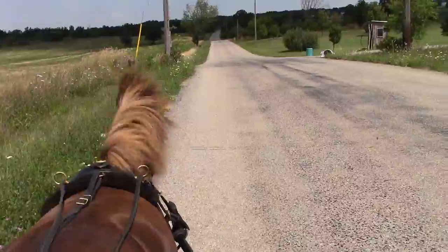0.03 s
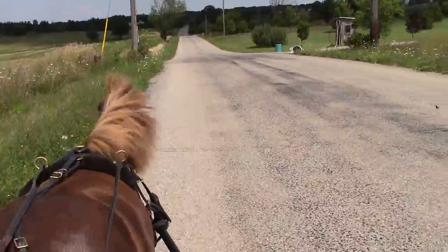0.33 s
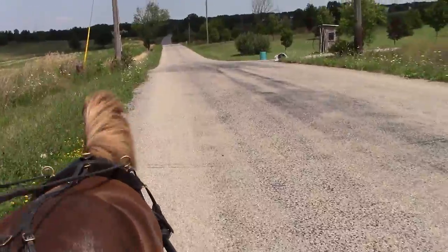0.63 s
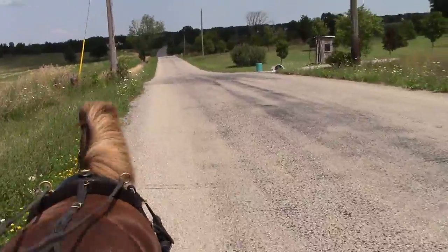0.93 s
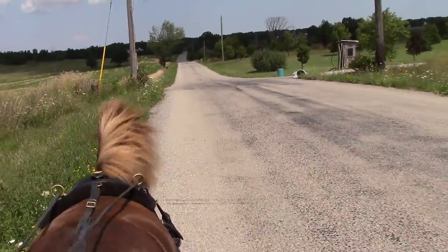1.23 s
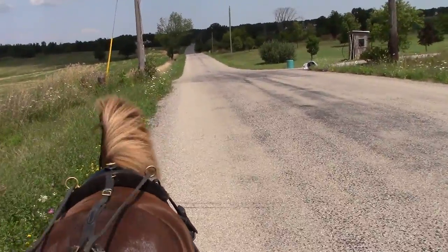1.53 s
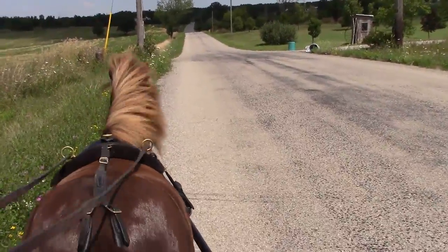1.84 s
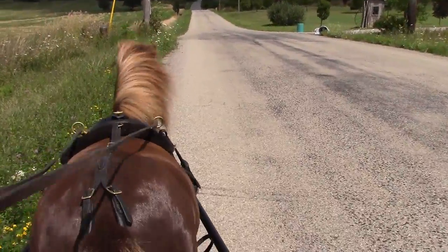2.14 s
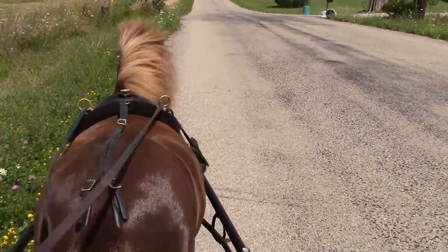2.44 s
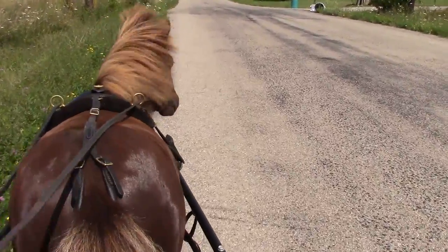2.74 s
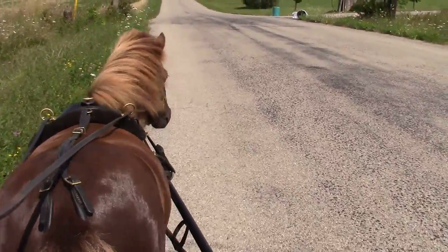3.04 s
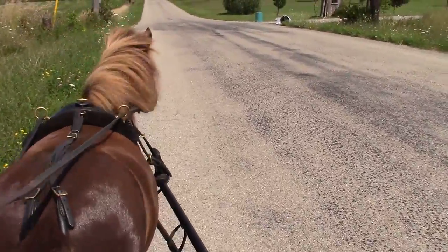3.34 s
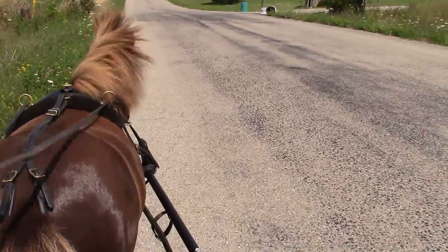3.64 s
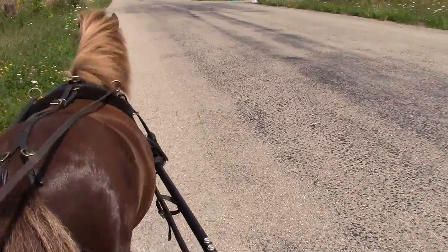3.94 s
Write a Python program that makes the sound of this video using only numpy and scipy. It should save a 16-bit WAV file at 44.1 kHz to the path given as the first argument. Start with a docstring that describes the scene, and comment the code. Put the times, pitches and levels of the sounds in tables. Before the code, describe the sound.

A horse's hooves clop at a brisk walk on a paved country road, heard from the cart it pulls. Wheels crunch grit, stones snap and the wooden cart knocks now and then, with faint insects and light wind.

```python
"""A horse walks briskly along a paved country road, heard from the cart it pulls.
Each hoof lands with a hollow clop, often heel then toe: a blow, ringing wall modes, a short grind.
Stones snap under wheels and shoes, bumps knock the wooden cart, the wheels rush and crunch over grit.
Insects chirp in the verge and gusts rumble on the microphone."""
import sys
import numpy as np
from scipy import signal
from scipy.fft import rfft, irfft
from scipy.io import wavfile
from scipy.ndimage import map_coordinates

SR = 44100
rng = np.random.default_rng(int(sys.argv[2]) if len(sys.argv) > 2 else 0)


def file_out(sig):
    """Save sig as 16-bit WAV at sys.argv[1]."""
    # one column per channel
    cols = np.atleast_2d(sig).T
    # limit, then scale
    lim = np.clip(cols, -1, 1)
    pcm = np.round(lim * 32767).astype(np.int16)
    wavfile.write(sys.argv[1], SR, pcm)


N = 176400

# hoof contacts: start_s, relative_db, pitch_hz, hollow_relative_db
HOOF_CONTACTS = [(0.074, -26.5, 1980, -1.5), (0.087, -24.5, 1250, -1), (0.191, -27, 945, 1.5),
                 (0.379, -21, 1780, -14), (0.388, -27, 1320, -1.5), (0.596, -28.5, 1490, -3.5),
                 (0.783, -25, 1330, -21), (0.795, -8, 1980, -13), (0.998, -30, 1130, 6),
                 (1.215, -22, 1360, -10), (1.2212, -14.5, 2200, -18), (1.423, -25, 1630, -6),
                 (1.61, -22, 1320, -9), (1.614, -14, 1350, -9), (1.819, -26, 1180, 4.5),
                 (1.826, -23, 1230, -5), (1.987, -26.5, 1330, -0.5), (1.995, -16, 2050, -25),
                 (2.203, -25.5, 1640, -17), (2.414, -25.5, 1450, 5), (2.432, -17.5, 2320, -4),
                 (2.647, -24.5, 1200, 2), (2.857, -22, 2120, -7), (2.863, -25.5, 1960, -10),
                 (3.07, -28, 1910, -5), (3.172, -21, 1340, 1), (3.253, -19, 1740, -3.5),
                 (3.419, -27, 1650, -9), (3.68, -21.5, 1310, 1), (3.69, -13.5, 1970, -30),
                 (3.902, -18, 1950, -2.5)]
# hoof wall modes: pitch_hz, gain_db, t60_s
WALL_MODES = [(810, -1, 0.03), (1306, 4, 0.027), (1816, -2, 0.01), (2270, -6.5, 0.01)]
# hoof click spectrum: freq_hz, gain_db
HOOF_EQ = [(80, -42), (300, -17), (700, -1), (1300, 7.5), (2300, 6.5), (3300, -5), (6000, -8), (16000, -18)]
# snapping stones: start_s, relative_db, pitch_hz, crack_relative_db
STONE_SNAPS = [(0.258, -17, 2200, 11), (0.674, -14, 2260, 19.5), (1.358, -22.5, 2940, 20.5),
               (1.543, -23.5, 1930, 10), (1.667, -15, 1730, 6), (1.677, -16.5, 1640, 12),
               (1.955, -26, 2600, -10), (1.972, -23, 2550, 10), (2.067, -23.5, 2370, 6),
               (2.736, -20.5, 1880, 15), (2.761, -13.5, 3040, 12.5), (2.92, -26.5, 2430, 2),
               (3.145, -20.5, 2390, 9), (3.173, -18.5, 1370, 19), (3.335, -17.5, 2080, 11),
               (3.537, -22, 2350, -27), (3.585, -24.5, 3020, 14), (3.604, -23, 2930, 15.5),
               (3.7613, -6.5, 2500, 4.5), (3.825, -20, 3260, 20)]
# stone click spectrum: freq_hz, gain_db
STONE_EQ = [(120, -15), (600, -18), (1500, 2), (2400, 5.5), (4300, -2.5), (6600, 1), (9000, -8.5),
            (16000, -24)]
# treble crack spectrum: freq_hz, gain_db
CRACK_EQ = [(1000, -72), (4000, -3), (6600, 4.5), (9000, -2.5), (16000, -7)]
# cart knocks: start_s, relative_db, pitch_hz
CART_KNOCKS = [(0.417, -20, 436), (0.457, -29, 410), (0.494, -25, 382), (2.495, -13.5, 457),
               (2.54, -18.5, 292), (3.416, -23, 386), (3.475, -25.5, 355), (3.711, -20.5, 330),
               (3.791, -15, 336)]
# thud spectrum of cart body and hoof hollow: freq_hz, gain_db
THUD_EQ = [(60, -41), (230, -3), (420, 1), (600, -4), (900, -6.5), (2000, -16), (5000, -26), (16000, -59)]
# rolling wheel envelope: time_s, level_db
ROLL_LEVELS = [(0, -57.5), (.45, -53.5), (.7, -55.5), (1.3, -53.5), (3, -53.5), (3.65, -51), (4, -53)]
# rolling wheel spectrum: freq_hz, gain_db
ROLL_EQ = [(30, -8), (80, -8), (150, -22), (295, 12.5), (600, 3.5), (1000, 0.5), (2100, -9), (3300, -8.5),
           (4500, -6), (6300, -12.5), (10500, -12.5), (15500, -19)]
# insect choruses: pitch_hz, spread_ratio, chirps_per_s, chirp_s, fall_ratio, pulse_db, level_db
CHORUSES = [(8503, 0.0327, 420, 0.00743, 0.063, 0.8, -53), (8845, 0.0142, 19, 0.034, 0.111, -0.5, -56.5),
            (12480, 0.025, 450, 0.0057, 0.022, 5, -65), (4850, 0.056, 160, 0.0123, 0.1, 0, -63)]
# near insect phrases: start_s, pitch_hz, chirps_per_s, level_db
NEAR_PHRASES = [(0.575, 4920, 22, -54), (1.08, 5050, 21, -51.5), (1.355, 4970, 25, -48),
                (1.376, 8140, 16.5, -42.5), (1.607, 5030, 24.2, -49.5)]
# wind gusts: centre_s, level_db, half_width_s
WIND_GUSTS = [(0.838, -51.5, 0.06), (1.226, -46.5, 0.2), (1.464, -43, 0.041), (1.581, -38.5, 0.022),
              (1.749, -28.5, 0.011), (1.79, -43.5, 0.082), (1.874, -33, 0.0088), (1.935, -33.5, 0.023),
              (2.34, -54, 0.33), (2.541, -37.5, 0.051), (2.706, -47, 0.07)]
# wind rumble spectrum: freq_hz, gain_db
WIND_EQ = [(30, -42), (70, -9.5), (115, -1), (172, 0.5), (240, -5), (400, -17.5), (950, -103)]

HOOF_GAIN_DB, STONE_GAIN_DB, KNOCK_GAIN_DB = 10.5, 9.5, 11
SOLE_CUTOFF_HZ, ECHO_S, GRIND_T60_S = 2960, 0.00245, 0.018
GRIT_PER_S, GRIT_OVER_RUSH_DB = 250, 15
PULSE_HZ, OVERTONE_RATIO = 11.5, 1.47
BREEZE_DB, BAND_LIMIT_HZ = -63, 15950


def hooves():
    """Each contact rings the hoof wall and hollow, echoes briefly, grinds and scuffs on the road."""
    out, click, thud = np.zeros((2, N)), impulse(HOOF_EQ), impulse(THUD_EQ)
    sole = signal.butter(4, SOLE_CUTOFF_HZ, fs=SR, output="sos")  # the sole softens the blow
    for start_s, db, hz, hollow_db in HOOF_CONTACTS:
        wall = norm(sum(amp(rng.normal(mode_db, 2)) * ring(mode_hz * rng.normal(1, 0.03), t60_s)
                        for mode_hz, mode_db, t60_s in WALL_MODES))
        strike = pop(hz, t60_s=0.004, cut_hz=710)
        blow = strike + amp(-3) * wall
        add(blow, ECHO_S * rng.uniform(0.8, 1.33), amp(-6) * strike)  # quick echo off the road
        blow = norm(signal.sosfilt(sole, blow))
        grind_db = -4.5 - 0.45 * (db + 22.5)  # lighter steps drag more
        grind = amp(grind_db) * crunch(click, GRIND_T60_S)
        hollow = amp(hollow_db - 1) * crunch(thud, t60_s=0.03)
        clop = place(norm(blow + grind) + hollow, crunch(click, GRIND_T60_S), side_db=-26)
        add(out, start_s, amp(db + HOOF_GAIN_DB) * clop)
        add(out, start_s, amp(-28) * crunch(click, t60_s=0.06))  # scuff
    return out


def stones():
    """A pinched stone pops, cracks in the treble and sprays grit."""
    out, click, bright = np.zeros((2, N)), impulse(STONE_EQ), impulse(CRACK_EQ)
    for start_s, db, hz, crack_db in STONE_SNAPS:
        spray = amp(-14) * crunch(click, t60_s=0.014) + amp(1) * crunch(click, t60_s=0.043)
        body = norm(pop(hz, t60_s=0.0031, cut_hz=690) + amp(5.5) * click + spray)
        crack = norm(bright + amp(6) * crunch(bright, t60_s=0.015))
        snap = norm(body + amp(crack_db - 14.5) * crack)
        side = crunch(bright, t60_s=0.011)
        add(out, start_s, amp(db + STONE_GAIN_DB) * place(snap, side, side_db=-22))
    return out


def cart():
    """Bumps knock the wooden body, which rings and shudders."""
    out, thud = np.zeros(N), impulse(THUD_EQ)
    for start_s, db, hz in CART_KNOCKS:
        body = pop(hz, t60_s=0.045, cut_hz=160) + amp(-6) * thud
        shudder = amp(1) * crunch(thud, t60_s=0.075)
        rattle = amp(-12.5) * crunch(impulse(HOOF_EQ), t60_s=0.055)
        add(out, start_s, amp(db + KNOCK_GAIN_DB) * norm(body + shudder + rattle))
    return out


def wheels():
    """Wheels rush over the coarse road and crunch through patches of fine grit."""
    rush = amp(1.6 * wobble(30.48)) * place(noise(ROLL_EQ), noise(ROLL_EQ), side_db=-13.5)
    grit, clicks = np.zeros((2, N)), [impulse(STONE_EQ), impulse(HOOF_EQ)] * 10
    for click in clicks:
        when, size, pan = rng.random((int(GRIT_PER_S * N / SR / len(clicks)), 3)).T
        gain = amp(3.3 * np.minimum(-np.log(1 - size), 3.5))  # many small grains, few large
        stereo_gains = place(gain, (2 * pan - 1) * gain, side_db=-11)
        hits = np.array([np.bincount((when * N).astype(int), g, N) for g in stereo_gains])
        grain = crunch(click, t60_s=0.013)
        grit += signal.oaconvolve(hits, grain[None], axes=1)[:, :N]
    patches_db = 3.3 * wobble(20.82)
    level_db = np.interp(np.arange(N) / SR, *np.transpose(ROLL_LEVELS))
    return amp(level_db) * (rush + grit * amp(GRIT_OVER_RUSH_DB + patches_db))


def wind():
    """Gusts over a light breeze buffet the microphone in quick lumps."""
    t = np.arange(N) / SR
    gusts = sum(amp(db) * np.exp(-((t - centre_s) / half_s) ** 2) for centre_s, db, half_s in WIND_GUSTS)
    lumps = amp(2.5 * wobble(35.9))
    rumble = place(noise(WIND_EQ), noise(WIND_EQ), side_db=-22)
    return (amp(BREEZE_DB) + gusts) * unit(lumps * rumble)


def insects():
    """Shimmering choruses, some pulsing, and three-chirp phrases close by."""
    pulse = np.sin(2 * np.pi * PULSE_HZ * np.arange(N) / SR + wobble(2.14))
    out = sum(amp(db + pulse_db * pulse) * chorus(hz, spread, per_s, chirp_s, fall)
              for hz, spread, per_s, chirp_s, fall, pulse_db, db in CHORUSES)
    for start_s, hz, per_s, db in NEAR_PHRASES:
        for k in range(3):
            add(out, start_s + k / per_s, amp(db) * chirp(hz, length_s=0.028, fall=560 / hz))
    return out


def chorus(hz, spread, per_s, chirp_s, fall):
    """Chirps scattered in time, pitch, level and pan; rms 1."""
    out = np.zeros((2, N))
    for k, (late, tune, size, pan) in enumerate(rng.standard_normal((int(per_s * N / SR), 4))):
        note = amp(2 * size) * chirp(hz * (1 + spread * tune), chirp_s, fall)
        add(out, (k + 0.092 * late) / per_s, place(note, (pan + 0.48) * note, side_db=-10.5))
    return unit(out)


def chirp(hz, length_s, fall):
    """A thin tone whose pitch flutters and sags."""
    u = np.linspace(0, 1, int(SR * length_s))
    flutter = 0.014 * np.interp(u, np.linspace(0, 1, 20), rng.standard_normal(20))
    phase = 2 * np.pi * np.cumsum(hz * (1 + flutter - fall * u ** 2)) / SR
    return np.sin(np.pi * u) * (np.sin(phase) + amp(-23) * np.sin(OVERTONE_RATIO * phase))


def ring(hz, t60_s):
    """Damped mode that swells over its first cycle; energy 1."""
    decay = fade(t60_s)
    cycles = hz * np.arange(len(decay)) / SR
    return norm(np.sin(2 * np.pi * cycles) * (1 - np.exp(-2 * cycles)) * decay)


def pop(hz, t60_s, cut_hz):
    """High-passed damped mode; energy 1."""
    highpass = signal.butter(2, cut_hz, "high", fs=SR, output="sos")
    return norm(signal.sosfilt(highpass, ring(hz, t60_s)))


def crunch(click, t60_s):
    """Dying shower of tiny contacts, each sounding the click; energy 1."""
    contacts = rng.standard_normal(len(click)) * fade(t60_s)
    return norm(signal.fftconvolve(contacts, click)[:len(click)])


def impulse(eq, size=4096):
    """Minimum-phase click with spectrum eq; energy 1."""
    cepstrum = irfft(np.log(bin_gains(eq, size)))
    cepstrum[1:size // 2] *= 2
    cepstrum[size // 2 + 1:] = 0
    return norm(irfft(np.exp(rfft(cepstrum))))


def noise(eq):
    """Noise with spectrum eq; rms 1."""
    return unit(irfft(rfft(rng.standard_normal(N)) * bin_gains(eq, N), N))


def bin_gains(eq, size):
    """Gain per FFT bin, interpolated over log frequency."""
    hz, db = np.transpose(eq)
    return amp(np.interp(np.log(np.fft.rfftfreq(size, 1 / SR) + 1), np.log(hz + 1), db))


def fade(t60_s, size=4096):
    """Exponential decay."""
    return np.exp(-np.log(1000) * np.arange(size) / SR / t60_s)


def wobble(knots_per_s):
    """Smooth random curve."""
    return map_coordinates(rng.standard_normal(1024), [np.arange(N) * knots_per_s / SR], mode="wrap")


def amp(db):
    """Decibels to gain."""
    return 10 ** (np.asarray(db) / 20)


def unit(x):
    """Scale to rms 1."""
    return x / np.sqrt(np.mean(x ** 2) + 1e-20)


def norm(x):
    """Scale to energy 1."""
    return x / np.sqrt(np.sum(x ** 2) + 1e-20)


def place(mid, side, side_db):
    """Mid and side to left and right."""
    return np.array([mid + amp(side_db) * side, mid - amp(side_db) * side])


def add(track, start_s, x):
    """Mix x into track at start_s."""
    part = track[..., max(0, round(start_s * SR)):][..., :x.shape[-1]]
    part += x[..., :part.shape[-1]]


def scene():
    """Horse, cart and wind slightly to the right, insects around them."""
    balance = amp([[-0.35], [0.35]])
    return (hooves() + stones() + cart() + wheels() + wind()) * balance + insects()


def record(dry):
    """Brick-wall low-pass."""
    return irfft(rfft(dry) * (np.fft.rfftfreq(N, 1 / SR) < BAND_LIMIT_HZ), N)


dry = scene()
out = record(dry)
file_out(out)
```